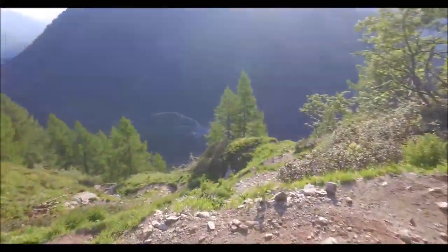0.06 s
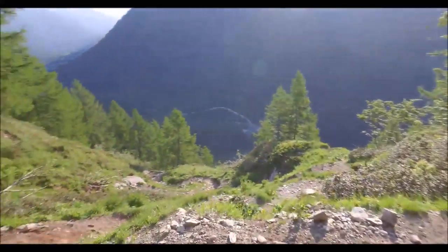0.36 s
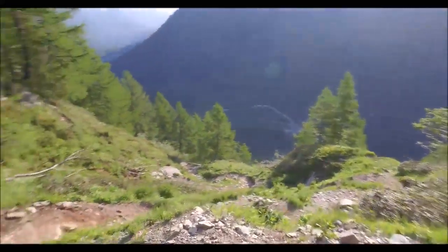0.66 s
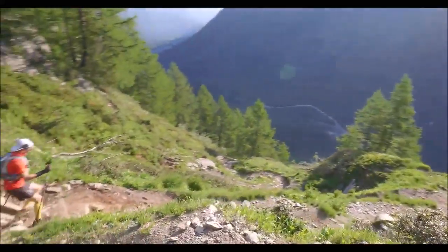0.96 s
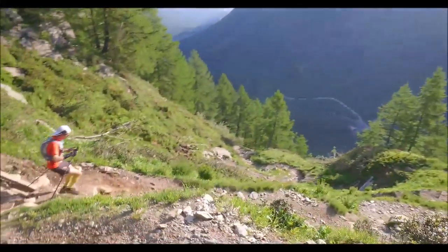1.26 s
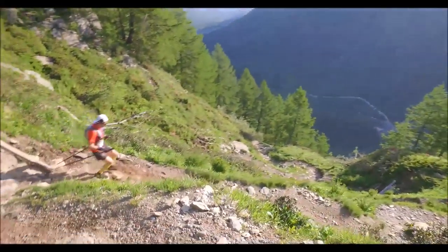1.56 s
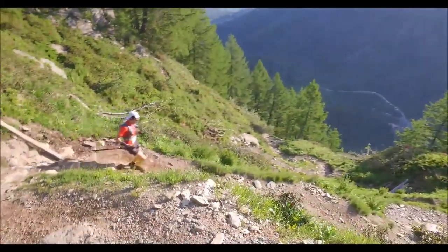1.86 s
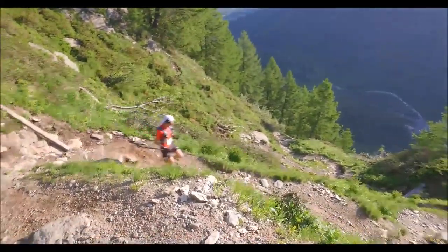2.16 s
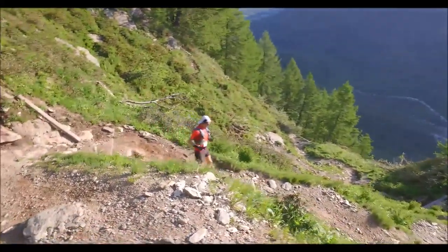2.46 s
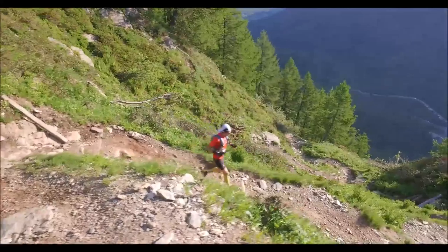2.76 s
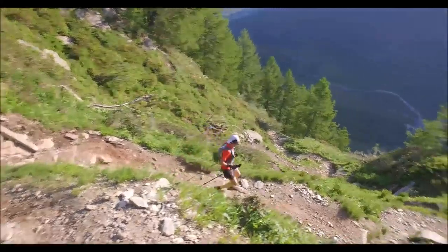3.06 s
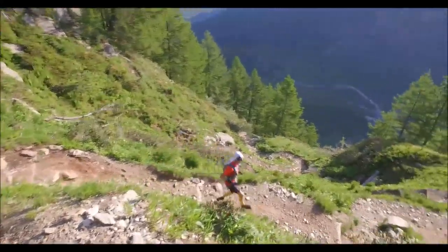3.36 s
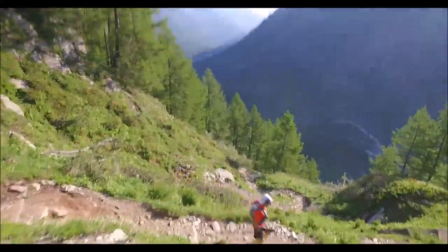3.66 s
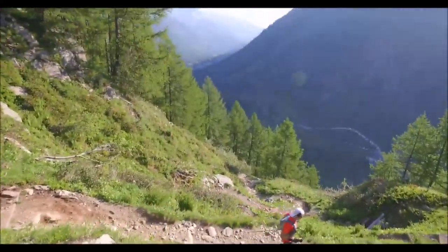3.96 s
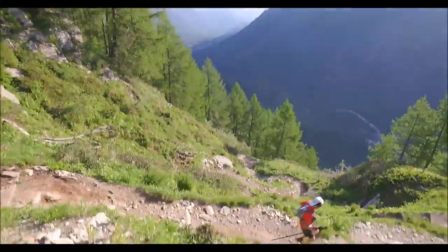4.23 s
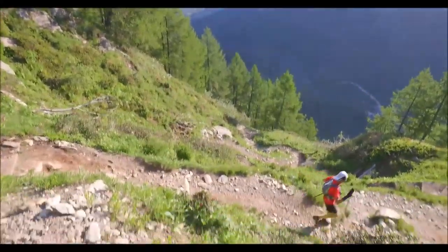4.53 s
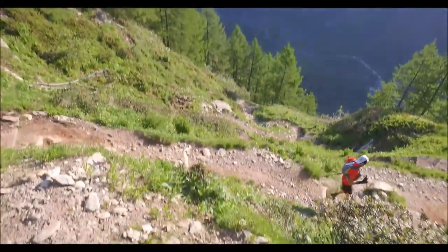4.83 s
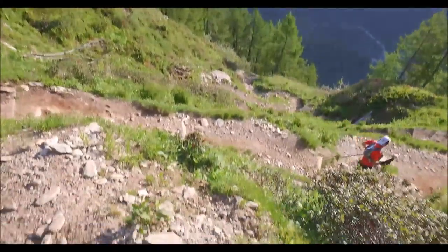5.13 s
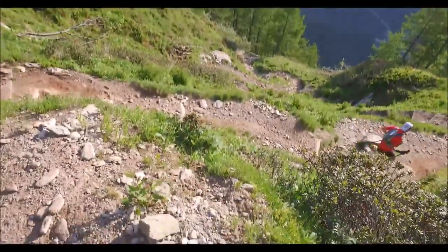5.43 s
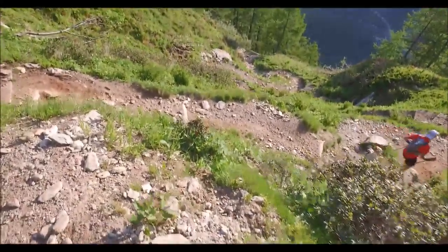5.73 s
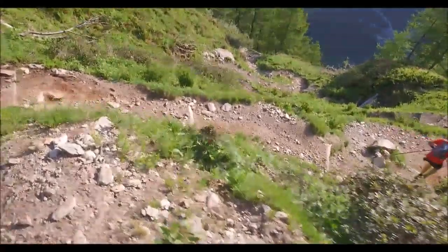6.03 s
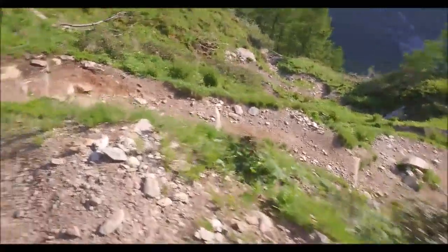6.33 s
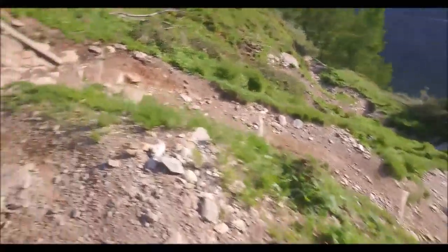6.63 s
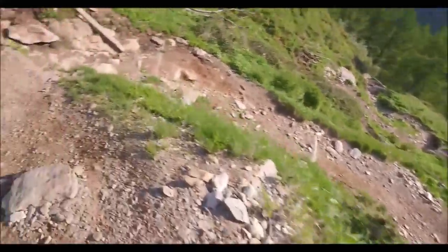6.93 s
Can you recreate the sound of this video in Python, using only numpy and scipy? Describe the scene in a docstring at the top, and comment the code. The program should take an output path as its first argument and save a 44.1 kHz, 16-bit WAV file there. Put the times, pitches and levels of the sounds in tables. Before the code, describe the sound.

Wind gusts on a hand-held microphone while fingers click and knock on the case, and a runner's shoes scuff faintly on gravel.

```python
"""A hand-held camera follows a trail runner down a mountain path. From the start, wind buffets the
microphone port over a rush of air and far-off water and a thin hiss. For 1.5 s the camera jolts in
the hand while the grip rubs, knocks and snaps on its plastic case. Shoes then scuff faintly on
gravel and the handling thins out. Two hard knocks ring the case at 3.7 and 5.3 s; the rush grows
a little, and a last gust arrives at 7 s."""
import sys
import numpy as np
from scipy import signal
from scipy.fft import rfft, irfft
from scipy.io import wavfile
from scipy.ndimage import uniform_filter1d

SR = 44100
rng = np.random.default_rng(int(sys.argv[2]) if len(sys.argv) > 2 else 0)


def int16_out(signal):
    """Quantize to a 16-bit WAV file."""
    q = np.round(np.clip(np.atleast_2d(signal).T, -1, 1) * 32767)
    wavfile.write(sys.argv[1], SR, q.astype(np.int16))


N = 312669
TIME_S = np.arange(N) / SR
BINS_HZ = np.linspace(0, SR / 2, 2049) + 1


def undb(db):
    """Decibels to gain."""
    return 10 ** (np.asarray(db) / 20)


def level(x, db, span_s=None):
    """Scale to an rms level; with a span, as if all the energy fell within it."""
    samples = span_s * SR if span_s else len(x)
    return x * undb(db) / np.sqrt(np.sum(x ** 2) / samples + 1e-20)


def band(x, hz, width_hz):
    """One resonance, gain 1 at its centre."""
    return signal.lfilter(*signal.iirpeak(hz, hz / width_hz, fs=SR), x)


def ring(x, gain):
    """Pass x through a body of this gain, which answers at once and dies away (minimum phase)."""
    cepstrum = irfft(np.log(gain + 1e-6))
    half = len(cepstrum) // 2
    fold = np.r_[1, np.full(half - 1, 2), np.zeros(half)]
    response = irfft(np.exp(rfft(cepstrum * fold)))
    return signal.fftconvolve(x, response)[:len(x)]


def noise(spectrum, top_hz=SR / 2):
    """Noise of rms 1 with the given colour."""
    hz, db = np.transpose(spectrum)
    f = np.maximum(np.fft.rfftfreq(N, 1 / SR), 1)
    gain = undb(np.interp(np.log(f), np.log(hz), db, left=-120, right=-120))
    return level(irfft(rfft(rng.standard_normal(N)) * gain * (f < top_hz), N), 0)


def flicker(rate_hz):
    """Ramps between random values of spread 1."""
    hold = int(SR / rate_hz)
    return uniform_filter1d(np.repeat(rng.standard_normal(N // hold + 1), hold), hold)[:N]


def add(out, start_s, x):
    """Mix x into out from start_s."""
    i = max(int(start_s * SR), 0)
    out[i:i + len(x)] += x[:max(N - i, 0)]


# Wind spectra. Each row: frequency in Hz, relative density in dB.
BUFFET_SPECTRUM = [(12, -19), (30, 1.5), (70, -0.5), (120, -3.5), (165, -6.5), (220, -10.5), (400, -18),
                   (900, -77)]
ROAR_SPECTRUM = [(90, -20), (160, 5.5), (270, -7), (380, 1.5), (460, -3.5), (560, 3), (700, -10.5),
                 (1000, -7), (2000, -30), (4000, -69)]
# Gusts. Each row: peak time in seconds, length in seconds, buffet and roar in dB before trim.
GUSTS = [(0.02, 0.28, -45, -58.5), (0.285, 0.22, -39.5, -48.5), (0.64, 0.31, -50.5, -58),
         (0.91, 0.51, -51, -48.5), (1.41, 0.33, -54, -52.5), (2.292, 0.15, -50.5, -68),
         (2.577, 0.41, -50.5, -61), (3.006, 0.14, -48, -54), (3.345, 0.32, -55, -76),
         (3.728, 0.42, -49, -58), (4.198, 0.44, -61.5, -80), (5.34, .08, -54, -55), (7.02, 0.53, -50, -67)]


def wind(calm_buffet_db=-62, calm_roar_db=-60.5, buffet_trim_db=0.6, roar_trim_db=-0.55, rise=0.48):
    """Gusts build and die over a light breeze: eddies thump at the port and the wind roars low."""
    buffet_power, roar_power = undb(calm_buffet_db) ** 2, undb(calm_roar_db) ** 2
    for peak_s, length_s, buffet_db, roar_db in GUSTS:
        from_peak = (TIME_S - peak_s) / length_s
        swell = np.exp(-np.maximum(-from_peak / rise, from_peak / (1 - rise)))
        buffet_power += (undb(buffet_db) * swell) ** 2
        roar_power += (undb(roar_db) * swell) ** 2
    buffet = noise(BUFFET_SPECTRUM) * undb(buffet_trim_db + 2.2 * flicker(36))
    roar = noise(ROAR_SPECTRUM) * undb(roar_trim_db + 1.4 * flicker(30))
    return buffet * np.sqrt(buffet_power) + roar * np.sqrt(roar_power)


# Dips in the background. Each row: start in seconds, end in seconds, depth in dB.
DIPS = [(0, -0.017, 7), (0.404, 0.8, 7.5), (1.2, 1.27, 4), (2.416, 2.507, 10), (3.123, 3.26, 10.5),
        (3.35, 3.782, 7.5), (4.897, 5.04, 8.5), (6.156, 6.206, 11)]


def dip_db(fade_s=0.13, return_s=0.088):
    """How far the rush has sunk: each dip fades down, holds and comes back."""
    return np.max([np.interp(TIME_S, [start - fade_s, start, end, end + return_s], [0, depth, depth, 0])
                   for start, end, depth in DIPS], axis=0)


# Rush spectrum. Each row: frequency in Hz, relative density in dB.
RUSH_SPECTRUM = [(300, -6), (700, -3.5), (1250, 2.5), (1700, -2), (2080, 3.5), (2260, -4), (2410, 7.5),
                 (2560, 0), (2720, -9), (3000, -1), (3280, -10), (3650, -3.5), (4100, -12), (9000, -21.5)]
# Rush envelope. Each row: time in seconds, level in dB before trim and dips.
RUSH_ENVELOPE = [(0, -60.5), (1.5, -57), (1.85, -57.5), (4.05, -57), (5.1, -58.5), (5.8, -54), (6.5, -56),
                 (7.09, -55)]


def valley_rush(trim_db=1, flicker_db=0.6):
    """Air and far-off water merge into a smooth rush that dips now and then."""
    db = np.interp(TIME_S, *np.transpose(RUSH_ENVELOPE)) + trim_db - dip_db()
    return noise(RUSH_SPECTRUM) * undb(db + flicker_db * flicker(25))


# Hiss spectrum. Each row: frequency in Hz, relative density in dB.
HISS_SPECTRUM = [(3000, -20), (5350, -27), (5850, 1), (6600, 2.5), (8100, 4.5), (8900, 8.5), (9400, 1),
                 (9900, 10), (10700, 2), (12000, 3.5), (13000, 5.5), (13500, -4), (14500, 11.5),
                 (15300, -2.5)]


def microphone_hiss(db=-64, dip_share=0.26, flicker_db=1.9):
    """The microphone's own hiss, a little weaker while the rush dips."""
    return noise(HISS_SPECTRUM, top_hz=15350) * undb(db - dip_share * dip_db() + flicker_db * flicker(25))


# Narrow hiss envelope. Each row: time in seconds, level in dB before dips.
NARROW_ENVELOPE = [(0, -70), (0.45, -79), (0.95, -75), (2.1, -77), (2.8, -73), (3.6, -76), (4.15, -79),
                   (4.3, -70.5), (4.75, -72), (5.1, -75), (5.4, -73), (5.9, -69), (6.35, -68), (6.6, -76),
                   (6.9, -68), (7.09, -68)]


def narrow_hiss(hz=5880, width_hz=480, dip_share=0.6, waver_db=1.8):
    """A narrow, high band of hiss swells, wavers and sinks with the rush."""
    hiss = band(band(rng.standard_normal(N), hz, width_hz), hz, width_hz)
    db = np.interp(TIME_S, *np.transpose(NARROW_ENVELOPE)) - dip_share * dip_db()
    return level(hiss, 0) * undb(db + waver_db * flicker(14))


# Camera jolts. Each row: start in seconds, peak in dB, frequency in Hz, 60 dB decay time in seconds.
JOLTS = [(0.003, -25.5, 201, 0.036), (0.248, -31, 94, 0.06), (0.621, -29, 138, 0.022),
         (1.282, -47, 157, 0.036), (2.574, -43.5, 118.5, 0.47), (3.703, -37.5, 136.5, 0.43),
         (3.955, -41, 156, 0.046), (4.47, -38.5, 70, 0.065)]


def jolts():
    """The camera's mass bounces briefly on the soft hand."""
    out, t = np.zeros(N), np.arange(SR // 3) / SR
    for start_s, db, hz, t60_s in JOLTS:
        add(out, start_s, undb(db - 60 * t / t60_s) * np.sin(2 * np.pi * hz * t))
    return out


# Gravel scuffs. Each row: start in seconds, level in dB, typical stone pitch in Hz.
SCUFFS = [(0.04, -62, 4400), (1.52, -58, 4300), (1.655, -58, 900), (1.905, -57, 750), (2.03, -59, 2600),
          (2.145, -57, 1000), (2.488, -57, 950), (2.54, -58, 900), (3.95, -55, 1900), (4.26, -57, 1300)]


def gravel(scuff_s=0.028, count=14, size_spread_db=5, pitch_spread_octaves=0.6, decay_cycles=1.5):
    """A shoe shoves a handful of small stones; each clicks for a cycle or two at its own pitch."""
    out, t = np.zeros(N), np.arange(SR // 10) / SR
    for start_s, db, hz in SCUFFS:
        onset_s = scuff_s * rng.random((count, 1))
        pitch, size = rng.standard_normal((2, count, 1))
        cycles = np.maximum(t - onset_s, 0) * hz * 2 ** (pitch_spread_octaves * pitch)
        stones = undb(size_spread_db * size) * np.sin(2 * np.pi * cycles) * np.exp(-cycles / decay_cycles)
        add(out, start_s, level(stones.sum(0), db, scuff_s))
    return out


def modal_gain(modes, scatter_db=0.7):
    """Gain of a set of resonances; each contact point weights them a little differently."""
    power = 0
    for hz, width_hz, db in modes:
        detuning = (BINS_HZ ** 2 - hz ** 2) / (BINS_HZ * width_hz)
        power += undb(db + scatter_db * rng.standard_normal()) ** 2 / (1 + detuning ** 2)
    return np.sqrt(power)


# Case resonances. Each row: frequency in Hz, width in Hz, relative gain in dB.
CASE_MODES = [(280, 190, 5.5), (500, 190, 8), (720, 420, 3.5), (966, 260, 6), (1800, 260, -7.5),
              (2420, 230, 7.5), (2880, 34, -2), (3680, 240, 0.5)]


def case_gain(lead_modes=(), notch_hz=870, notch_width_hz=50):
    """The case's resonances and anti-resonance, plus any modes that a blow brings out."""
    offset_hz = BINS_HZ - notch_hz
    notch = np.hypot(offset_hz, notch_width_hz / 4) / np.hypot(offset_hz, notch_width_hz)
    return modal_gain(CASE_MODES + list(lead_modes)) * notch


# Shell resonances. Each row: frequency in Hz, width in Hz, relative gain in dB.
SHELL_MODES = [(3670, 600, -7), (6000, 330, 9), (6550, 450, 7), (7800, 550, 9.5), (8900, 1100, -1),
               (10500, 550, 6.5), (12600, 1400, 2.5), (14900, 700, 6.5)]


def shell_gain():
    """The thin shell's bright ring."""
    return modal_gain(SHELL_MODES)


# Finger slides. Each row: start in seconds, end in seconds, creak level in dB, creak centre in Hz,
# scratch level in dB, slip unevenness from 0 to 1.
RUBS = [(0.08, 0.104, -52.5, 1188, -61, 0.7), (0.14, 0.155, -51.5, 1894, -74, 0.6),
        (0.234, 0.241, -35, 850, -60, 0.4), (0.25, 0.268, -48, 1000, -62, 0.7),
        (0.294, 0.332, -49, 1184, -67, 0.7), (0.305, 0.358, -38.5, 440, -62.5, 0.25),
        (0.385, 0.403, -45, 308, -83, 0.15), (0.567, 0.578, -51, 656, -67, 0.6),
        (0.868, 0.888, -52, 1227, -43.5, 0.5), (0.89, 0.928, -41, 654, -44, 0.48),
        (0.93, 0.955, -49, 620, -66, 0.6), (0.99, 1.03, -42, 950, -47.5, 0.7),
        (1.008, 1.028, -51, 2700, -56, 0.7), (1.436, 1.477, -49, 446, -73, 0.32),
        (2.289, 2.3, -45, 720, -45.5, 0.54), (2.968, 3.008, -55.5, 538.5, -67, 0.57),
        (3.334, 3.364, -64, 605, -59.5, 0.5), (3.412, 3.438, -54.5, 2020, -74, 0.06),
        (3.781, 3.803, -48, 1020, -83, 0.3), (3.808, 3.838, -51, 1083, -83, 0.45),
        (3.87, 3.911, -58, 672, -57.5, 0.5), (4.985, 5.002, -54.5, 1580, -60, 0.4),
        (5.88, 5.895, -68, 1500, -59, 0.5), (6.328, 6.37, -55, 601, -67, 0.4)]


def rubs(slip_spread_db=3, swell_power=0.43, release_s=0.002, grain_db=3.5, grain_s=0.001):
    """Skin sticks and slips on the plastic, harder as it goes; its fine grain scratches the shell."""
    out = np.zeros(N)
    for start_s, end_s, creak_db, hz, scratch_db, uneven in RUBS:
        span_s = end_s - start_s
        t = np.arange(int((span_s + 0.02) * SR)) / SR
        pressure = np.minimum(t / span_s, 1) ** swell_power * np.clip((span_s - t) / release_s + 1, 0, 1)
        gap, strength = rng.standard_normal((256, 2)).T
        # Even slips squeak, uneven ones rasp.
        slip_samples = (np.cumsum(np.exp(uneven * gap)) / hz * SR).astype(int)
        slips = np.bincount(slip_samples, undb(slip_spread_db * strength), len(t))[:len(t)]
        friction = band(slips * np.sqrt(pressure), hz, width_hz=0.49 * hz)
        creak = ring(friction, case_gain() / np.hypot(1, BINS_HZ / (2 * hz)))
        grain = undb(grain_db * np.interp(t / grain_s, np.arange(256), rng.standard_normal(256)))
        direct_gain = 0.89 * BINS_HZ / (BINS_HZ + 5000)
        scratch = ring(rng.standard_normal(len(t)) * grain * pressure, shell_gain() + direct_gain)
        add(out, start_s, level(creak, creak_db, span_s) + level(scratch, scratch_db, span_s))
    return out


def disperse(x, hz=1300, width_hz=1500):
    """Bending waves cross the case at different speeds, which rounds the first spike (an all-pass)."""
    return 2 * band(x, hz, width_hz) - x


# Grip knocks. Each row: start in seconds, thud level in dB, contact corner in Hz, roll-off above it in
# dB per octave before the bass tilt, snap level in dB, leading modes as (Hz, relative dB) pairs.
KNOCKS = [(0.242, -29, 1070, 21, -61, [(710, 15), (2030, 11)]), (0.2932, -39.5, 700, 9, -59, [(1390, 2)]),
          (0.589, -42.5, 750, 19, -67, [(2000, 12), (4050, 22)]), (0.6108, -51, 1300, 12, -53, [(1390, 6)]),
          (0.6218, -40, 280, 11.5, -68, []), (0.8142, -39, 1380, 18, -36, [(2200, 20), (280, 13)]),
          (0.8553, -29.5, 500, 9, -36, [(1760, 19), (820, 19)]), (0.8882, -40, 1080, 9, -44, [(1000, 6)]),
          (0.9024, -29.5, 520, 13, -48, [(1130, 20), (2260, 13)]), (0.9166, -38.5, 440, 9, -42, [(500, 4)]),
          (0.9263, -44, 880, 7, -48, []), (0.9648, -41.5, 1040, 37, -68, [(850, 10)]),
          (0.9815, -52, 690, 9, -47.5, []), (1.0983, -45.5, 500, 8, -50, [(1390, 7)]),
          (1.1075, -38.5, 1650, 22, -36, [(3630, 16), (1390, 6)]), (1.1098, -42, 1000, 8, -41, [(960, 10)]),
          (1.2804, -41.5, 330, 15, -70, [(280, 6)]), (1.4271, -44.5, 1600, 27, -42.5, [(330, 17),
          (1390, 6)]), (1.5103, -45, 1500, 4, -41, [(910, 12)]), (2.2575, -45, 800, 11, -55.5, [(300, 18)]),
          (2.3019, -37.5, 680, 19, -45, [(1360, 18), (3300, 22)]), (2.5649, -46, 600, 17, -68, [(600, 6)]),
          (3.3523, -39.5, 640, 21, -62, [(700, 6)]), (3.7017, -19, 590, 8.5, -31, [(410, 5), (570, 8),
          (1440, 13), (2700, 3)]), (3.9067, -38.5, 250, 9, -51, [(1240, 21), (2560, 19)]),
          (3.9175, -46, 1300, 16, -70, [(800, 8)]), (4.2155, -51.5, 840, 10, -69, [(1000, 4)]),
          (4.9743, -53, 950, 20, -71, []), (5.13, -42.5, 720, 18, -72, [(750, 3)]),
          (5.3267, -19.8, 700, 11, -31.5, [(300, 9), (490, 14), (1060, 12), (2450, 9)]),
          (6.0248, -35.5, 2700, 7, -30.5, [(1230, 13), (290, 15)]),
          (7.0054, -44, 1070, 30, -63, [(1100, 8)]), (7.0598, -47.5, 820, 9, -69, [(1100, 4)])]


def knocks(bass_tilt=0.66, lead_width_share=0.2, tremble_s=0.0054, chatter_s=0.0009, give_s=0.0004):
    """A push flexes and rings the case, loose parts tremble, and a snap sets the shell chattering."""
    out, t = np.zeros(N), np.arange(SR // 16) / SR
    blow = signal.unit_impulse(len(t))
    for start_s, thud_db, corner_hz, rolloff_db, snap_db, modes in KNOCKS:
        tremble = 0.025 * rng.standard_normal(len(t)) * np.exp(-t / tremble_s)
        chatter = 0.55 * rng.standard_normal(len(t)) * np.exp(-t / chatter_s)
        # A softer contact pushes for longer and loses its treble sooner.
        ratio = BINS_HZ / corner_hz
        push_gain = ratio ** bass_tilt / np.sqrt(0.5 + ratio ** (rolloff_db / (10 * np.log10(2))))
        lead_modes = [(hz, lead_width_share * hz, db) for hz, db in modes]
        body = ring(blow + tremble, push_gain * case_gain(lead_modes))
        thud = disperse(disperse(body), hz=2300, width_hz=1000)
        snap = ring(blow + chatter, shell_gain())
        # The case gives just before the shell snaps.
        add(out, start_s - give_s, level(thud, thud_db, span_s=0.01))
        add(out, start_s, level(snap, snap_db, span_s=0.01))
    return out


def ticks(count=45, db=-59, scatter_db=1, typical_corner_hz=800):
    """Faint dull ticks ring the case at random moments; they sink when the rush dips."""
    out, blow = np.zeros(N), signal.unit_impulse(SR // 16)
    for when, softness, hardness in rng.random((count, 3)):
        ratio = BINS_HZ / (typical_corner_hz * 2 ** (2 * hardness - 1))
        body = ring(blow, case_gain() * ratio / (1 + ratio ** 2) ** 2)
        tick_db = db - scatter_db * (2 * softness - 1)
        add(out, when * N / SR, level(disperse(body), tick_db, span_s=0.01))
    return out * undb(-dip_db())


def scene():
    """Everything meets at one microphone in open air, with no echo."""
    background = wind() + valley_rush() + microphone_hiss() + narrow_hiss()
    return (background + jolts() + gravel() + rubs() + knocks() + ticks())[None]


def record(dry):
    """The camera cuts the treble above 15.9 kHz."""
    return signal.sosfilt(signal.ellip(8, .2, 70, 15900, fs=SR, output="sos"), dry, axis=-1)


dry = scene()
out = record(dry)
int16_out(out)
```